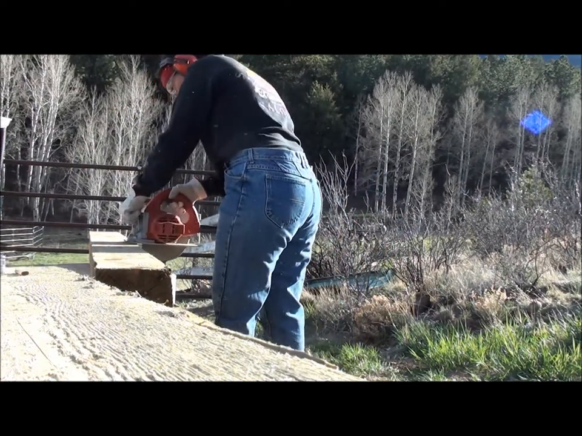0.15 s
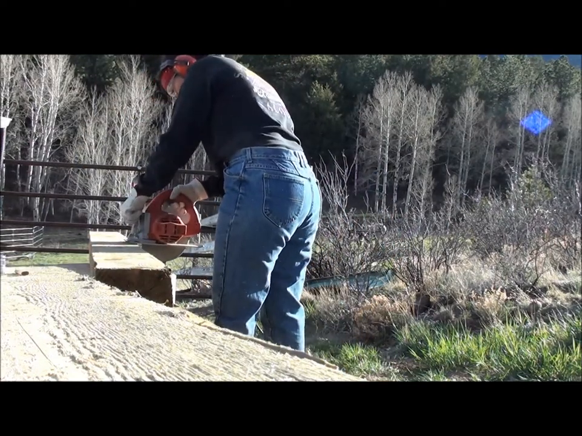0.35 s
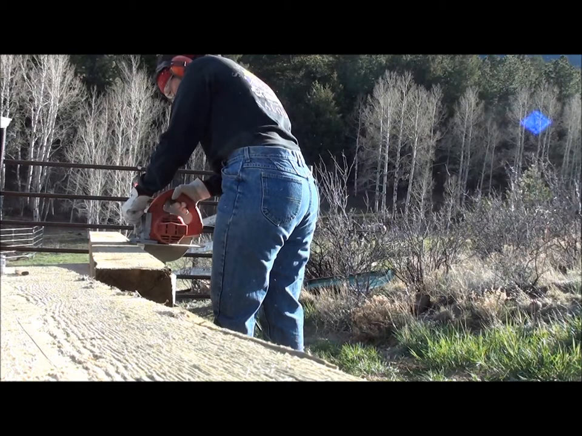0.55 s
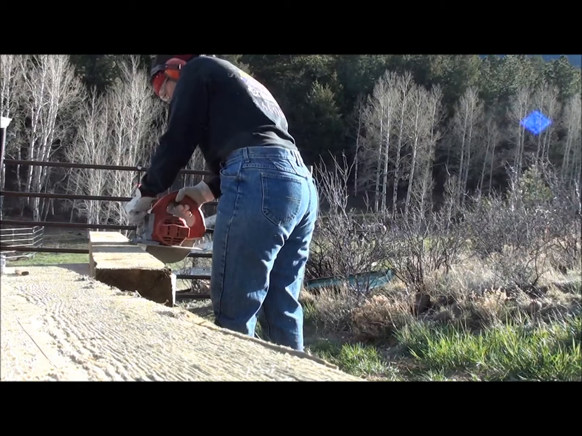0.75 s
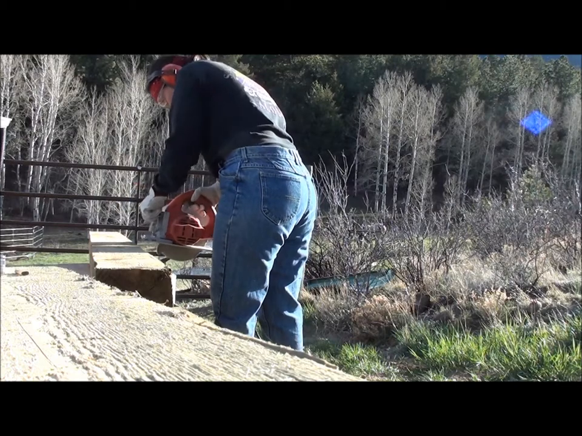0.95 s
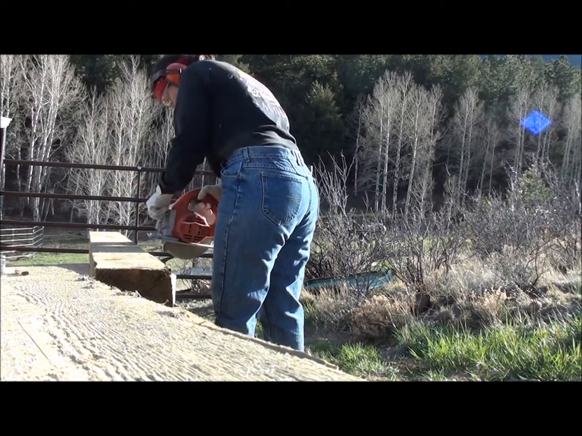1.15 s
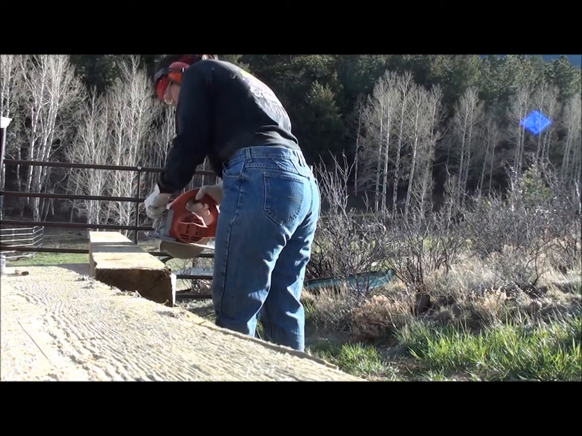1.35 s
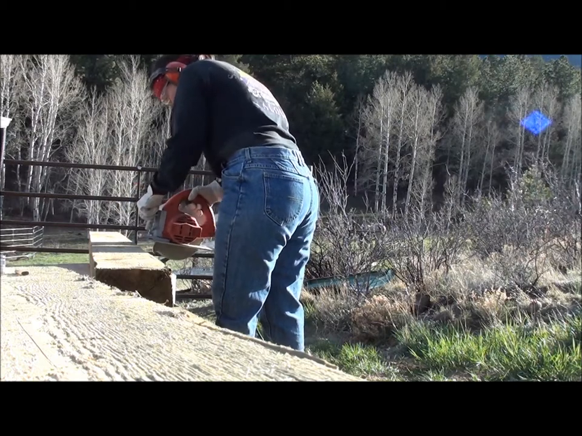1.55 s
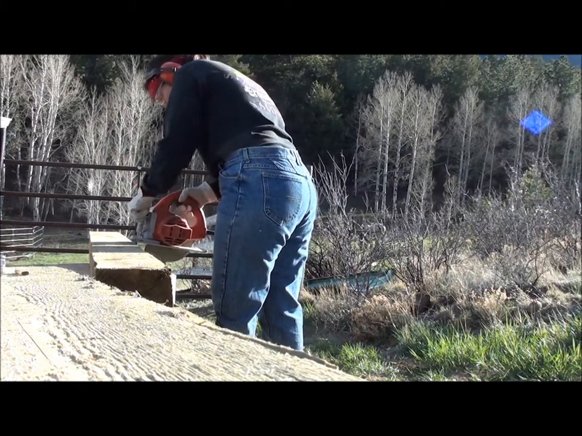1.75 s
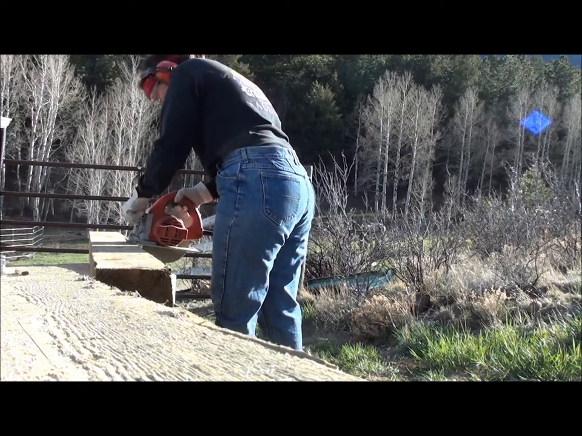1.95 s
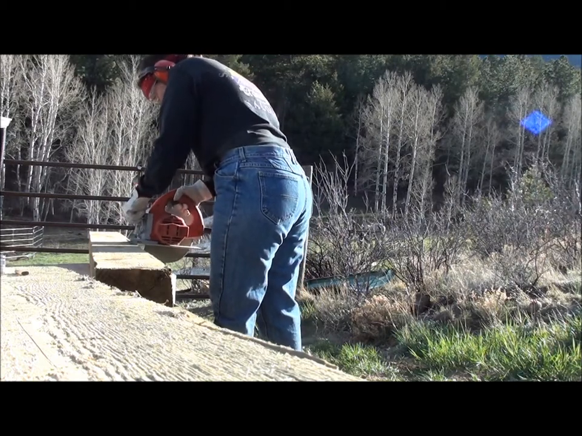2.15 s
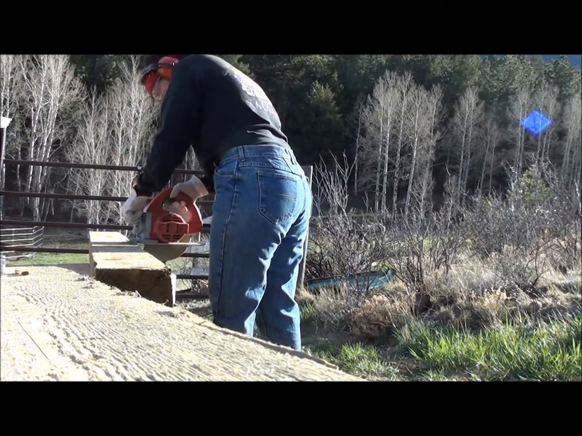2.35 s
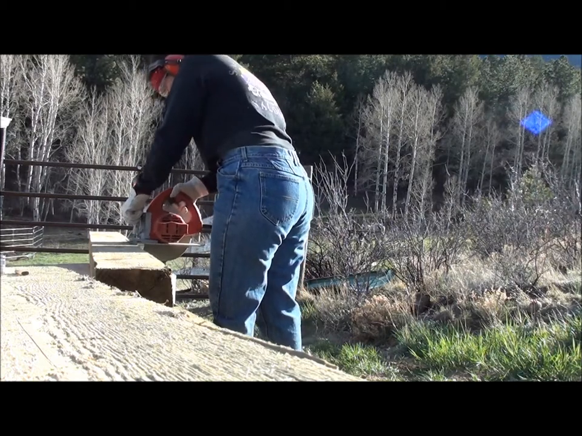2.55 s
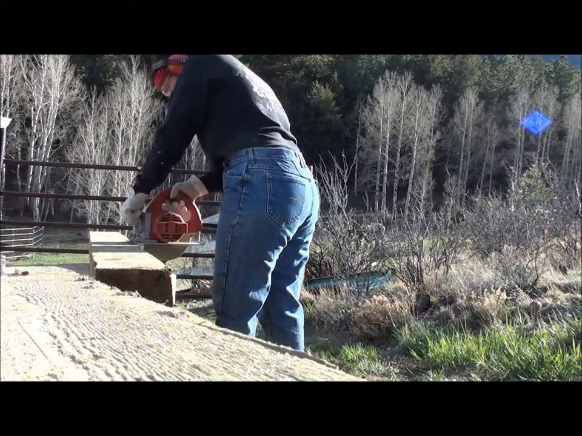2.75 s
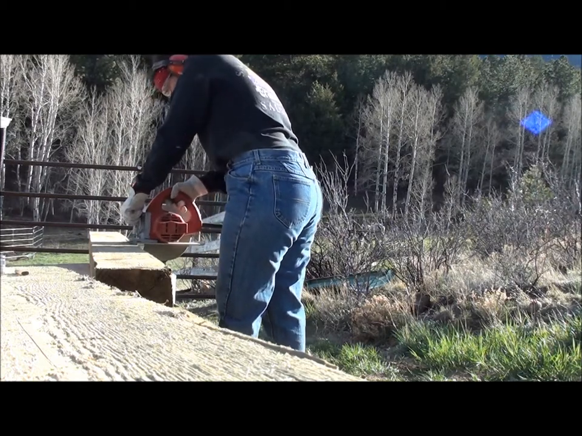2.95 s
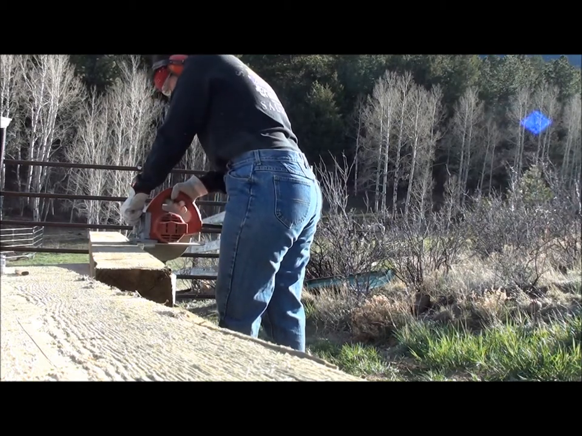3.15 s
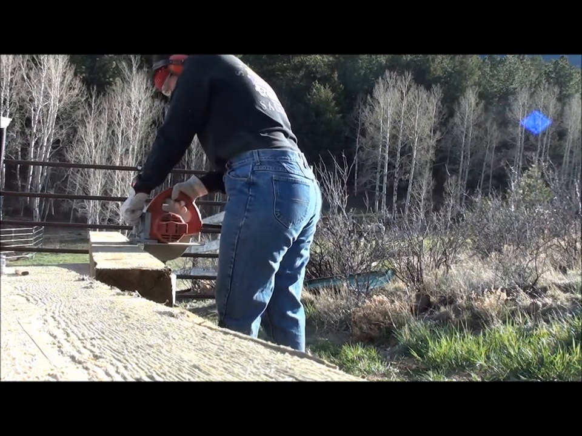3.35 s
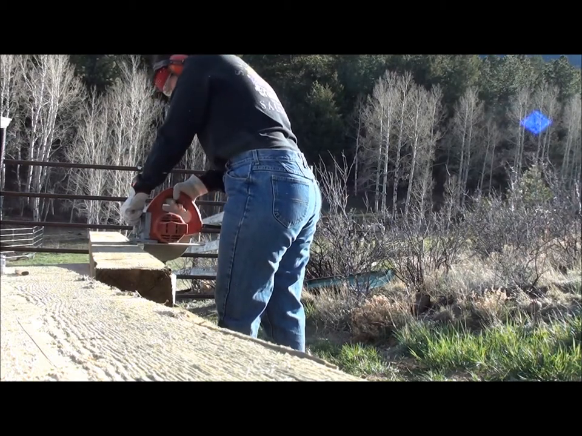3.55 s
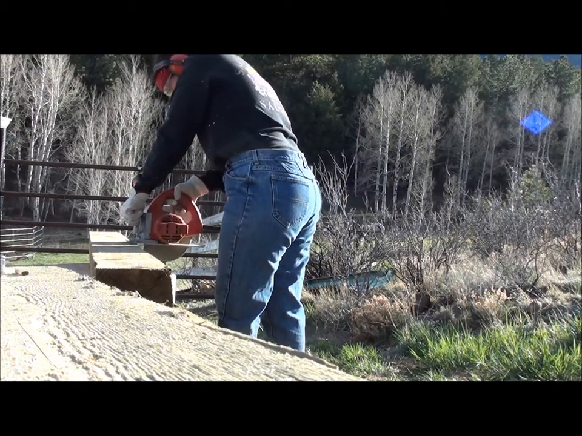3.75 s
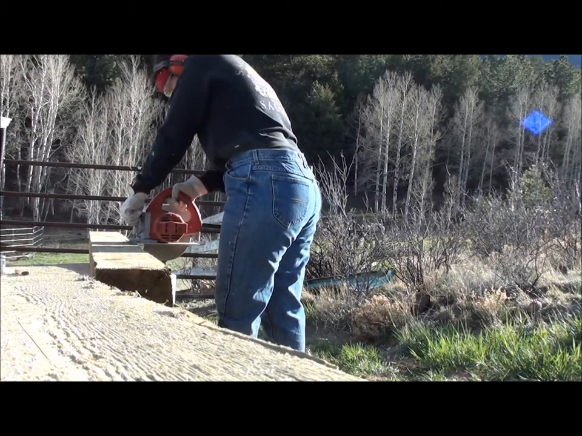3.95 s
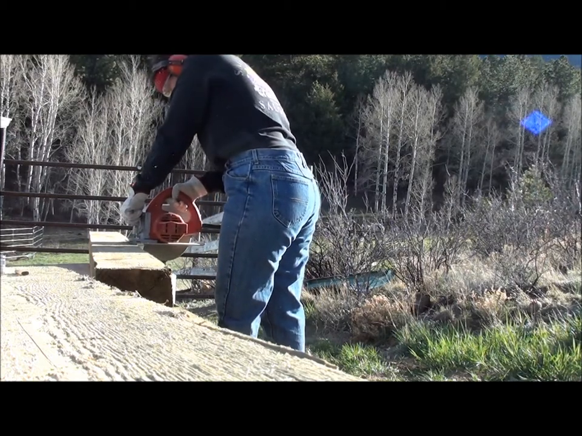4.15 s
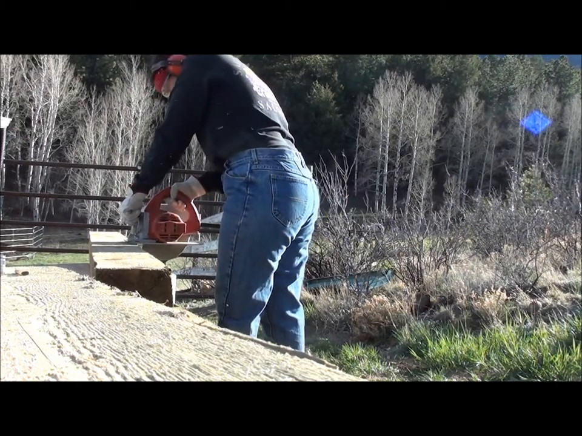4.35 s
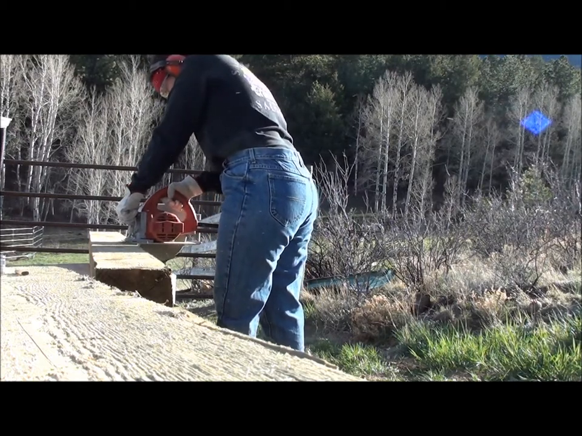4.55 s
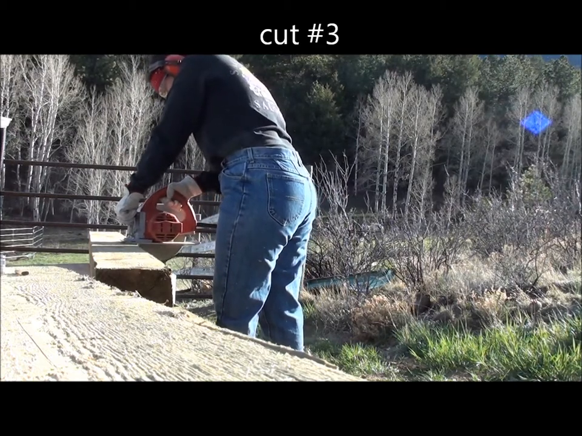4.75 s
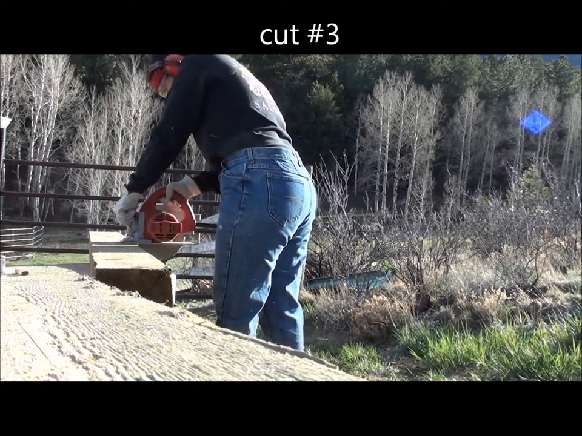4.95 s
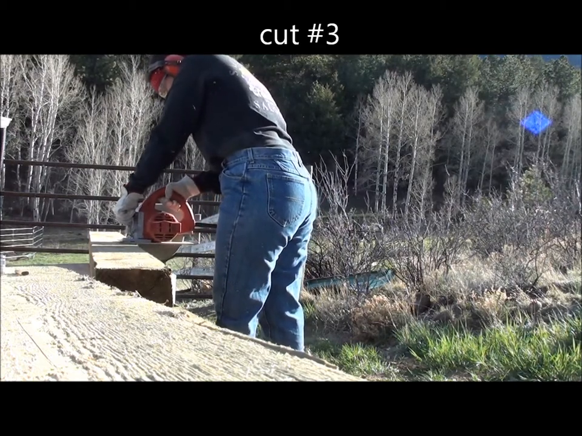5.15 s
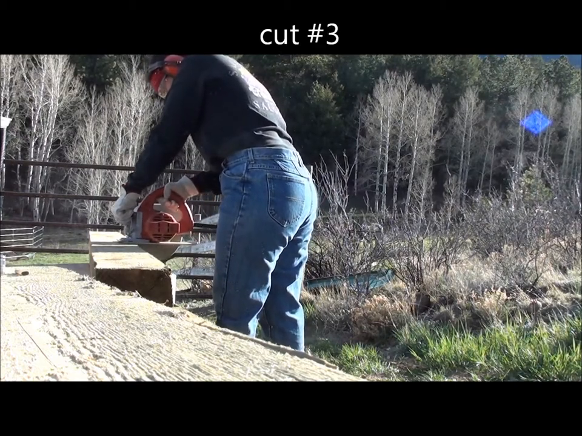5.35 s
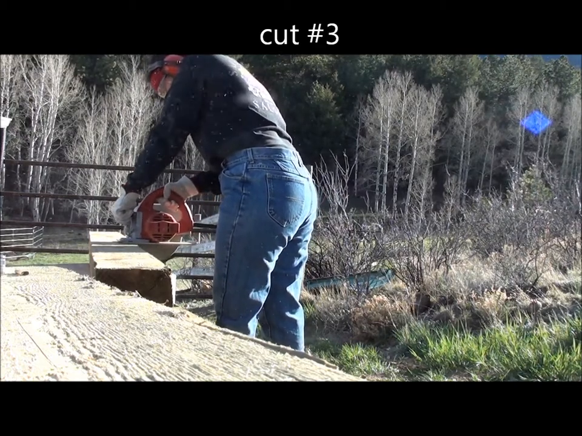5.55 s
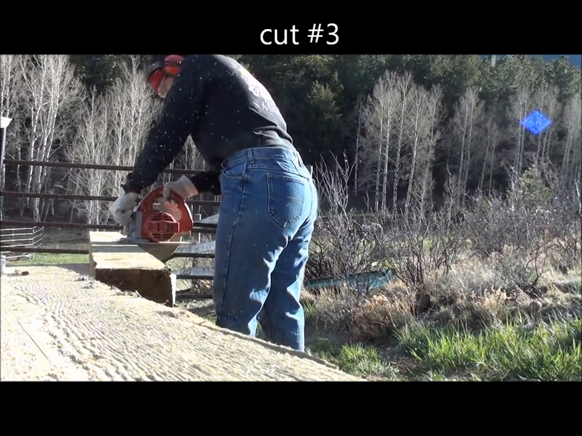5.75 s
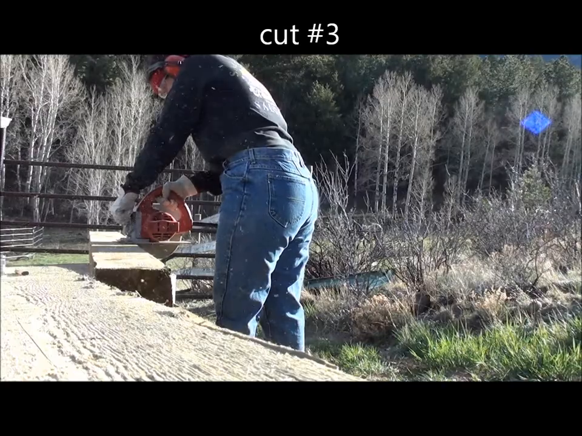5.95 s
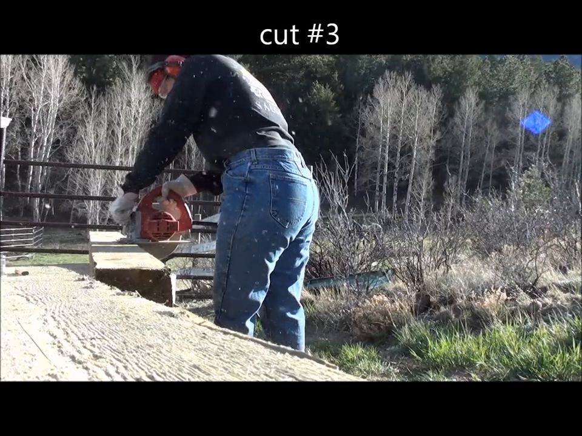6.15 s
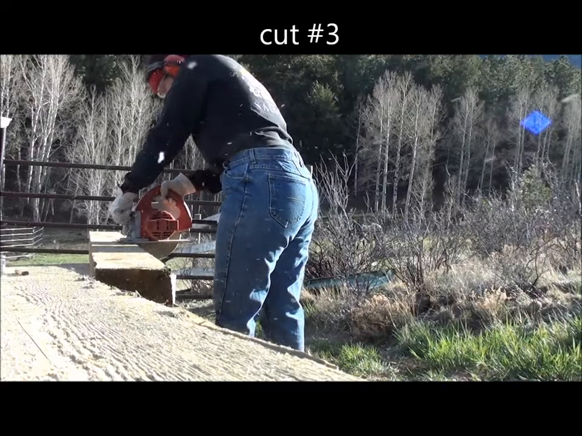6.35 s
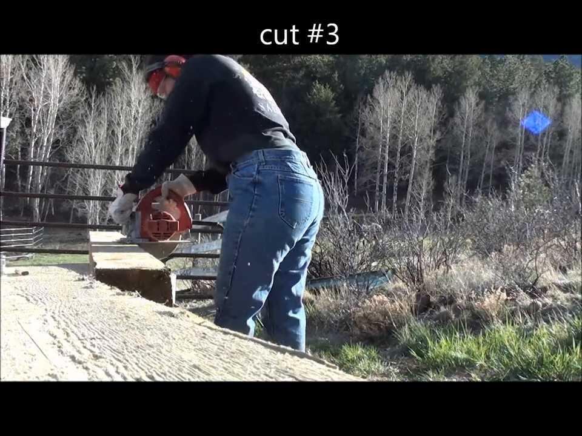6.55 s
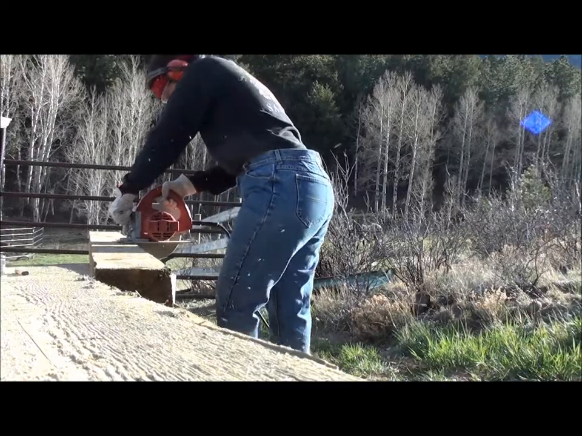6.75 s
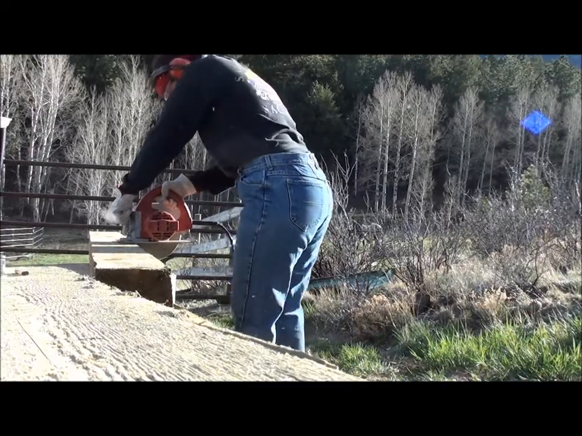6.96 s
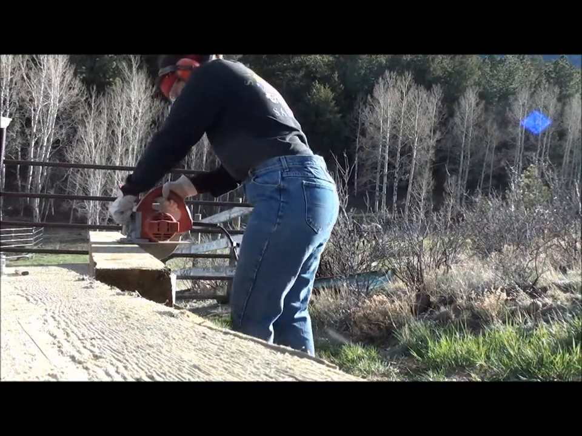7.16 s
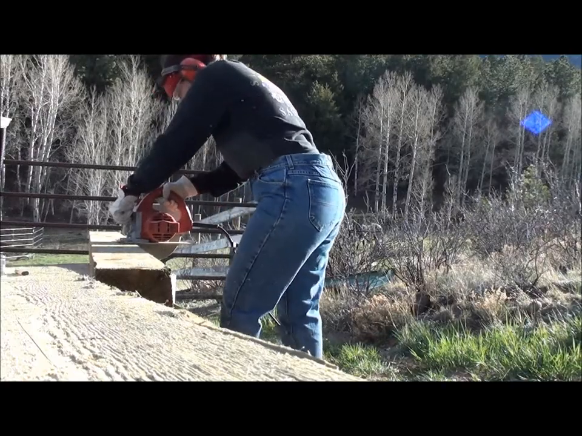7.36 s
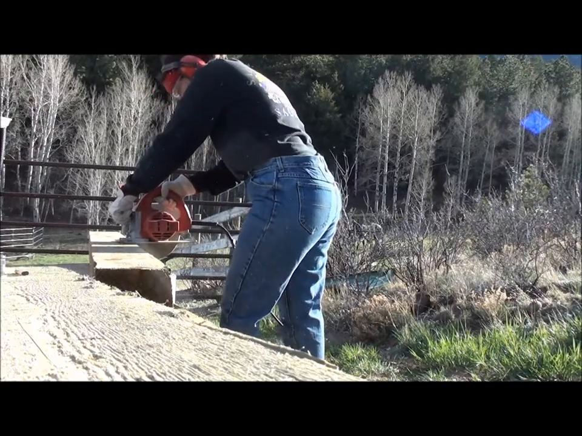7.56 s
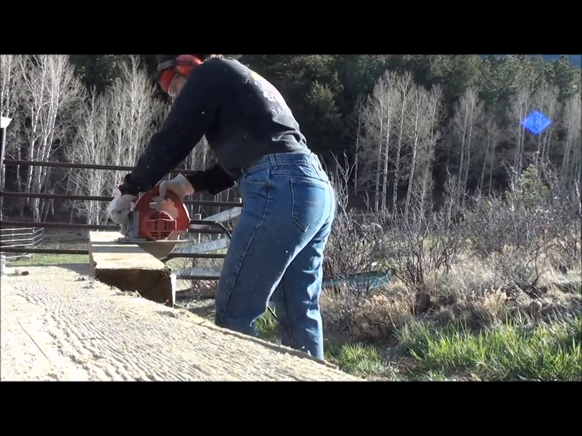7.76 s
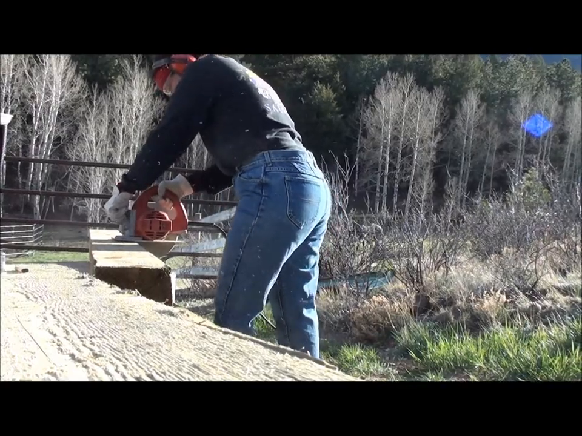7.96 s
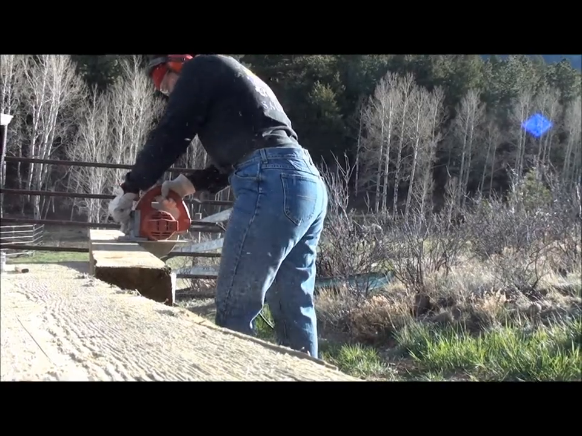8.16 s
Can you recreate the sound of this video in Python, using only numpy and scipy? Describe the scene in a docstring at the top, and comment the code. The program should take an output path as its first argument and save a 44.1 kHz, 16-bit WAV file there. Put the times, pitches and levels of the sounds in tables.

```python
"""A circular saw and hummingbirds

Outdoors, hummingbirds dart past with trilling wings while a circular saw is set on a timber: its shoe scrapes
and knocks. The trigger snaps, the motor growls and winds up to a whine over a roar of air; near the end the
blade bites and rings. Tones that follow the rotor speed make the motor, shaped noise the air and wood, and
chirps the wings. A noise hush lies behind and swells slowly; the background falls away once the saw runs; light
gusts bump the microphone."""
import sys
import numpy as np
from scipy import signal
from scipy.fft import rfft, irfft, next_fast_len
from scipy.io import wavfile
from scipy.ndimage import uniform_filter1d, minimum_filter1d

SR = 44100
rng = np.random.default_rng(int(sys.argv[2]) if len(sys.argv) > 2 else 0)


def int16_out(signal):
    """Quantize to a 16-bit WAV file."""
    q = np.round(np.clip(np.atleast_2d(signal).T, -1, 1) * 32767)
    wavfile.write(sys.argv[1], SR, q.astype(np.int16))


N = 361179
T = np.arange(N) / SR   # time of each sample in seconds

SWITCH_ON_S = 3.727
FREE_TURNS_PER_S = 402.1   # rotor speed with no load
BLADE_RATIO = 4.8   # rotor turns per blade turn
# how hard the teeth are pressed into the wood: (time [s], load [0-1])
FEED = [(6.6, 0), (7.4, .25), (7.63, .78), (7.76, .62), (7.86, 1), (7.98, .68), (8.05, .8), (8.17, .45)]
# stereo spread of most noises: (frequency [Hz], side minus mid [dB])
WIDTH = [(450,-12.5),(1600,-17),(8500,-17.5),(12000,-59)]


def from_db(db):
    """Decibels to gain."""
    return 10 ** (np.asarray(db) / 20)


def rms_one(x):
    """Scale to unit power."""
    return x / np.sqrt(np.mean(x ** 2) + 1e-20)


def in_time(rows):
    """Read each column of a time table at every sample."""
    s, *columns = np.transpose(rows)
    return [np.interp(T, s, column) for column in columns]


def at_hz(points, hz):
    """Read a spectrum, with straight lines on a log-frequency axis."""
    table_hz, table_db = np.array(points)[:, 0], np.array(points)[:, 1]
    return np.interp(np.log(hz), np.log(table_hz), table_db)


def drift(rate):
    """Smooth random wander of spread 1; a higher rate wanders faster."""
    # made at every 40th sample; the first 2000 values let the filter settle
    r = np.exp(-80 * np.pi * rate / SR)
    steps = rng.standard_normal(N // 40 + 2002)
    slow = signal.lfilter([1], [1, -2 * r, r * r], steps)[2000:]
    return np.interp(np.arange(N) / 40, np.arange(len(slow)), rms_one(slow))


def phase_of(hz):
    """Running angle of a changing frequency."""
    return 2 * np.pi * np.cumsum(hz) / SR


def tone(hz):
    """A sine of unit power, starting at a random angle."""
    return np.sqrt(2) * np.sin(phase_of(hz) + rng.uniform(0, 2 * np.pi))


def pan(x, left_db):
    """Make two sides, the left louder by left_db."""
    return x * from_db(np.array([[.5], [-.5]]) * left_db)


def noise(colour, resonances=(), ripple_db=0, spread=WIDTH):
    """Stereo noise of unit power; ripple stands for the many small modes of a body."""
    size = next_fast_len(N)
    hz = np.maximum(np.arange(size // 2 + 1) * SR / size, 1)
    lifts = sum(lift / (1 + (2 * (hz - f) / width) ** 2) for f, width, lift in resonances)
    knots = np.arange(0, SR / 2, 35)
    ripple = ripple_db * np.interp(hz, knots, rng.standard_normal(len(knots)))
    db = at_hz(colour, hz) + lifts + ripple
    mid, side = rfft(rng.standard_normal((2, size))) * from_db(db)
    side = side * from_db(at_hz(spread, hz))
    return rms_one(irfft(np.array([mid + side, mid - side]), size)[:, :N])


def ring(x, hz, t60):
    """A damped resonance: a unit click starts a sine of height 1 that falls 60 dB in t60 seconds."""
    r, w = from_db(-60 / (t60 * SR)), 2 * np.pi * hz / SR
    return signal.lfilter([0, np.sin(w)], [1, -2 * r * np.cos(w), r * r], x + 1e-18)


def band_pass(x, hz, width):
    """One resonance, gain 1 on top."""
    return signal.lfilter(*signal.iirpeak(hz, hz / width, fs=SR), x)


def burst(start, fade, rise):
    """An envelope that rises quickly and dies away."""
    age = np.maximum(T - start, 0)
    return (1 - np.exp(-age / rise)) * np.exp(-np.minimum(age / fade, 50))


def ramp(start, end):
    """Rises evenly from 0 to 1 between two moments."""
    return np.clip((T - start) / (end - start), 0, 1)


def swell(s, half):
    """A flat-topped swell around a moment."""
    return np.exp(-.5 * np.minimum(np.square((T - s) / half), 10) ** 2)


def rotor_speed():
    """Turns per second: the rotor closes in on its free speed until the wood brakes it."""
    # a quick surge and a slow creep, until air drag holds the speed: (share of free speed, time constant [s])
    run_up = [(.432, .157), (.574, .62)]
    # the wood grazes first and then bites: (start [s], end [s], speed lost [turns per s])
    braking = [(7.3, 7.8, 3), (7.8, 8.07, 25)]
    age = np.maximum(T - SWITCH_ON_S, 0)
    free = FREE_TURNS_PER_S * sum(share * (1 - np.exp(-age / lag)) for share, lag in run_up)
    lost = sum(loss * ramp(start, end) for start, end, loss in braking)
    braked = np.minimum(free, FREE_TURNS_PER_S) - lost
    return np.maximum(braked, 1) * (1 + 0.00024 * drift(16))


def roar(turns, load):
    """Air through fan and guard: the lows grow most with speed, the cut muffles it, and the resonances waver in strength."""
    # spectrum of the rushing air: (frequency [Hz], level [dB per Hz])
    roar_colour = [(120, -56), (200, -22.5), (399, -9), (690, -6.5), (890, -12.5), (1380, -6.5),
                   (2470, -5.5), (2850, -10), (3360, -4), (5110, -4), (6350, 0), (8660, -7.5),
                   (11400, -24.5), (12900, -27), (15500, -63)]
    # resonances of the guard and housing: (frequency [Hz], width [Hz], lift [dB])
    resonances = [(1400,350,3.6),(2400,260,3),(3460,220,1.3)]
    # change of each range: (lower edge [Hz], at standstill [dB], at full load [dB], in the brief dip [dB])
    roar_bands = [(0, -9, -9.5, -1.7), (1150, -7.5, -9, -2.5), (2900, -8.5, -9, -2.5), (5500, -7, -7, -1)]
    air = noise(roar_colour, ripple_db=1.1)
    for hz, width, lift_db in resonances:
        # each resonance grows stronger and weaker as the saw moves
        lift = from_db(lift_db + 1.0 * drift(9)) - 1
        air = air + lift * band_pass(air, hz, width)
    size = next_fast_len(N)
    spectrum, bins = rfft(rms_one(air), size), np.arange(size // 2 + 1) * SR / size
    slip = 1 - turns / FREE_TURNS_PER_S   # share of the speed still missing
    dip = swell(6.29, .16)   # the roar dips briefly
    tops = [row[0] for row in roar_bands[1:]] + [SR]
    out = 0
    for (low, rest_db, buried_db, dip_db), high in zip(roar_bands, tops):
        band = irfft(spectrum * ((bins >= low) & (bins < high)), size)[:, :N]
        out = out + band * from_db(rest_db * slip + buried_db * load ** 2 + dip_db * dip)
    return out


def blade(turns):
    """The roar flutters with each turn of the blade; in the wood the teeth rasp and the steel plate rings."""
    # spectrum of the rasping teeth: (frequency [Hz], level [dB per Hz])
    bite_colour = [(1500,-25),(4000,-1.5),(7000,1),(8700,4),(10000,-8),(15500,-44)]
    # plate modes, each swelling as the rim rubs: (frequency [Hz], loudest time [s], half length [s], level [dB])
    plate_modes = [(1920,7.37,.11,-25.5),(3760,8.16,.05,-29),(4145,7.67,.09,-21.3),(4781,7.655,.095,-21.8),(4480,8.12,.035,-26),(4942,8.02,.04,-25),(6686,7.68,.09,-27.5),(7090,7.9,.06,-26),(7845,7.89,.07,-22.5),(7810,8.03,.055,-22),(8425,7.78,.11,-27.5),(8690,8.07,.04,-25.5),(8764,7.83,.045,-27)]
    roar_db, rasp_db = -12.1, -15.5   # roar at free speed, rasp at full load
    load, = in_time(FEED)
    turning = np.sin(phase_of(turns / BLADE_RATIO))
    air = roar(turns, load) * from_db(roar_db + .5 * turning + 0.75 * drift(130))
    rasp_gain = from_db(rasp_db + turning + 0.96 * drift(100))
    rasp = load * noise(bite_colour, ripple_db=1.5) * rasp_gain
    rings = 0
    for hz, s, half, db in plate_modes:
        unsteady_hz = hz * (1 + .001 * drift(30))
        rings = rings + swell(s, half) * from_db(db + 1.5 * drift(15)) * tone(unsteady_hz)
    return ramp(SWITCH_ON_S, SWITCH_ON_S + .04) * air + rasp + rings


def rotor_tones(turns, spun_up):
    """Hums at whole multiples of the turning rate, stronger as the rotor speeds up."""
    # rotor tones before the housing colours them: (multiple of the turning rate, level [dB])
    orders = [(1,-39.5),(12,-36),(15,-36),(16,-26.5)]
    # how well the housing radiates them: (frequency [Hz], level [dB])
    rotor_colour = [(4700,-9),(5300,1),(5750,1.5),(6000,-5),(6300,-5),(6420,.5)]
    out = 0
    for k, db in orders:
        gain = from_db(db + at_hz(rotor_colour, k * turns) + 2 * drift(8))
        out = out + gain * tone(round(k) * turns)
    return spun_up ** 2 * out


def commutator_whine(turns, spun_up):
    """The 32 commutator bars passing in each turn make a whine that climbs with the speed."""
    # loudness of the whine along its climb: (frequency [Hz], level [dB])
    whine_colour = [(6700,-38),(7450,-22.5),(8300,-21.5),(9500,-32),(11900,-41.5),(12500,-31.5),(12900,-39)]
    buried_db = -4.5   # change at full load
    bars_hz = 32 * turns
    load, = in_time(FEED)
    whine = from_db(at_hz(whine_colour, bars_hz) + buried_db * load + drift(15)) * tone(bars_hz)
    # higher multiples sweep past only while the rotor is still slow
    overtones = 0
    for k in (1.5, 2):
        overtones = overtones + np.clip((14000 - k * bars_hz) / 3000, 0, 1) * tone(k * bars_hz)
    return whine + spun_up * from_db(-37) * overtones


def tooth_whistle(turns, spun_up):
    """Vortices leave the teeth unsteadily, once stronger in each turn of the blade; at speed they fray into an airy band."""
    # the whistle follows the rotor up to a ceiling of 4350 Hz
    hz = np.minimum(13.3 * turns, 4350)
    vortex_hz = hz + 100 * drift(150)
    throb = 1 + .7 * np.sin(phase_of(turns / BLADE_RATIO))
    octave = 2.3 * (1 - spun_up) * tone(2 * vortex_hz + 60 * drift(150))
    during_run_up = swell(4.31, .41)
    whistle = from_db(-22.5) * during_run_up * throb * (tone(vortex_hz) + octave)
    airy_band = rms_one(band_pass(rng.standard_normal(N), 4250, 300))
    return whistle + from_db(-28) * swell(5.3, .75) * airy_band


def motor(turns):
    """Rotor tones, commutator whine and the whistle of the teeth start together once the power is on."""
    running = ramp(SWITCH_ON_S, SWITCH_ON_S + .044)
    spun_up = turns / turns.max()
    tones = rotor_tones(turns, spun_up) + commutator_whine(turns, spun_up)
    return running * (tones + tooth_whistle(turns, spun_up))


def start_up(turns):
    """The inrush current hums at twice the mains rate and rattles the gears in step; it ebbs as the rotor gains speed."""
    # spectrum of the rattling gears: (frequency [Hz], level [dB per Hz])
    gear_colour = [(230,-14),(380,-8),(790,-13),(950,-1.5),(1800,1),(2600,0.5),(3000,-10.5),(7400,-8),(12000,-44)]
    inrush_db, idle_db = -13, -46   # gain at full current, and the part that stays when running free
    full_current_slip = .64   # strain falls once the speed lacks less than this share
    mains = 2 * np.pi * 119.7 * T   # angle at twice the mains rate
    rattle = rms_one(from_db(2.8 * np.sin(mains) + 1.5 * drift(170)))
    gears = noise(gear_colour, ripple_db=3.0) * rattle
    hum = from_db(-13) * np.sin(mains) + from_db(-22.5) * np.sin(2 * mains)
    current = np.clip((1 - turns / FREE_TURNS_PER_S) / full_current_slip, 0, 1)
    strain = from_db(inrush_db) * current ** 1.9 + from_db(idle_db)
    return ramp(SWITCH_ON_S, SWITCH_ON_S + .028) * strain * (from_db(-0.5) * gears + hum)


def trigger():
    """The switch contact is a tiny burst of noise that sets several small parts ringing."""
    # ringing parts: (frequency [Hz], peak level [dB], time to fall 60 dB [s])
    snap_modes = [(1500,-20,.008),(3350,-15,0.0062),(4740,-7.5,0.0098),(6000,-7,0.0063),(7900,-9,0.0076)]
    contact = burst(SWITCH_ON_S, 0.0011, 0.00093) * rng.standard_normal(N)
    out = 0
    for hz, db, t60 in snap_modes:
        mode = ring(contact, hz, t60)
        out = out + from_db(db) * mode / np.abs(mode).max()
    return out


def squeak(start, db, fade, hz):
    """One push of the shoe: a hoarse squeak in two resonances that rise as it slides."""
    rise = .2 * (1 - np.exp(-np.maximum(T - start, 0) / .09))   # share of the pitch
    hz = hz * (1 + rise + .06 * drift(110))
    both = from_db(-7) * tone(hz) + from_db(-10) * tone(.56 * hz)
    return from_db(db + 2.5 * drift(100)) * burst(start, fade, .003) * both


def scraping():
    """The shoe slides over the timber in short rough pushes, each a scrape of noise with a squeak."""
    # spectrum of the scrape: (frequency [Hz], level [dB per Hz])
    scrape_colour = [(200,-22),(550,5.5),(880,-1),(1120,4.5),(1350,-16),(3000,-29.5)]
    # pushes: (start [s], level before rise and fade [dB], fading time [s], squeak pitch at the start [Hz])
    pushes = [(.327,-41,0.075,1000),(1.268,-44,0.027,700),(1.33,-43.5,0.13,970),(1.969,-42,.05,1000),(2.248,-34,0.054,980),(2.29,-41,0.12,1000)]
    slide = sum(from_db(db) * burst(s, fade, 0.0018) for s, db, fade, _ in pushes)
    scrape = slide * from_db(2.0 * drift(120)) * noise(scrape_colour)
    return scrape + sum(squeak(*push) for push in pushes)


def knocking():
    """Guard and shoe knock: each short burst of noise excites one quickly damped resonance."""
    # knocks: (start [s], peak level [dB], centre frequency [Hz])
    knocks = [(0.0702, -29.5, 4690), (0.5696, -38, 3770), (0.7472, -33.5, 1880), (0.8535, -33.5, 2170),
              (0.9647, -32, 1880), (1.1204, -39.5, 2080), (1.4147, -35.5, 1880), (1.9215, -32.5, 3730),
              (2.1819, -25.5, 1770), (2.595, -29, 2210), (3.6097, -28, 5200)]
    out = 0
    for s, db, hz in knocks:
        knock = ring(burst(s, 0.0072, 0.00034) * rng.standard_normal(N), hz, 0.0023)
        out = out + from_db(db) * knock / np.abs(knock).max()
    return out


def to_the_left(x, lead_rad):
    """Reflections off the timber favour the left side: a little louder, and ahead in the low tones."""
    # tilt towards the left: (frequency [Hz], left minus right [dB])
    left_lift = [(400,0),(850,2.3),(1700,.7),(2300,3.5),(2900,.7),(5200,1.3)]
    hz = np.maximum(np.arange(N // 2 + 1) * SR / N, 1)
    turn = 1j * lead_rad / (1 + (hz / 1000) ** 4)
    sides = pan(1, at_hz(left_lift, hz)) * np.exp(turn * np.array([[.5], [-.5]]))
    return irfft(rfft(x) * sides, N)


def wing_trill(flight, chirp_s, sag_hz, flutter_db):
    """Wing-tip feathers whistle once a beat, the note sagging as the stroke ends; the bird comes closer, then draws away."""
    start, end, beats_per_s, first_hz, last_hz, closest_s, closest_db, fade_db_per_s, left_db = flight
    hz = np.interp(T, [start, end], [first_hz, last_hz])
    db = closest_db - fade_db_per_s * np.abs(T - closest_s)
    beats = (T - start) * beats_per_s + .5
    age = (beats % 1 - .5) / beats_per_s / chirp_s   # time from mid-stroke, in chirp lengths
    stroke = rms_one(np.exp(-age ** 2) * np.clip((1.6 - np.abs(age)) * 2, 0, 1))
    flying = (beats > 0) & (np.floor(beats) < (end - start) * beats_per_s)
    sag = sag_hz * np.clip(age, -.5, 2) ** 3
    whistle = tone(hz - sag + 60 * drift(92))
    return pan(flying * stroke * whistle * from_db(db + flutter_db * drift(20)), left_db)


def birds():
    """Hummingbirds dart about in short flights; ground and trees answer with faint echoes, different on each side."""
    # flights: (first wingbeat [s], end [s], wingbeats [per s], first pitch [Hz], last pitch [Hz],
    # closest time [s], level there [dB], loss away from there [dB per s], left minus right [dB])
    flights = [(.017, .25, 45.6, 5930, 6170, .187, -37, 110, 1.5),
               (.495, 1.28, 45.7, 6130, 6000, .9, -50, 8, 0),
               (.532, .98, 45.6, 6520, 6380, .95, -36, 36, -2.5),
               (.55, 1.42, 46, 6470, 6560, .8, -48, 16, -1.5),
               (1.424, 1.685, 44.2, 6570, 6500, 1.59, -40, 45, 1.3),
               (1.699, 2.645, 45.96, 6520, 6090, 1.97, -23.8, 4.5, 2.4),
               (2.335, 2.66, 46, 6600, 6690, 2.6, -26, 30, 0),
               (2.698, 2.99, 45.6, 6540, 6490, 2.877, -30, 100, -2),
               (3.012, 3.34, 45.6, 6700, 6360, 3.03, -30, 15, -4),
               (3.003, 3.315, 43.1, 6600, 6320, 3.24, -22.5, 55, -5),
               (3.334, 3.8, 46, 6450, 6340, 3.34, -38, 20, -4),
               (3.38, 3.8, 46, 6090, 5980, 3.44, -35, 40, -4)]
    # brief changes of the trill: (time [s], change [dB])
    flares = [(1.765, 6), (1.868, 5), (1.97, 6), (2.168, 6), (2.272, 4.5), (3.281, 3)]
    chirps = sum(wing_trill(flight, chirp_s=.0036, sag_hz=110, flutter_db=1.3) for flight in flights)
    chirps = chirps * from_db(sum(db * swell(s, .016) for s, db in flares))
    lags = (rng.uniform(.0075, .05, (2, 6)) * SR).astype(int)   # six echoes a side
    echoes = np.array([sum(np.pad(side, (lag, 0))[:N] for lag in own) for side, own in zip(chirps, lags)])
    return chirps + from_db(-18) * echoes


def outdoors():
    """A noise hush with two faint far drones swells slowly; the background falls away later on; lumpy low gusts
    bump the microphone."""
    # spectrum of the hush: (frequency [Hz], level [dB per Hz])
    air_colour = [(20,-18),(90,-8),(170,-4.5),(280,-4.5),(480,-4.5),(700,-7),(1100,-12.5),(2500,-18.5),(15500,-21.5)]
    # the open air is wider than the saw: (frequency [Hz], side minus mid [dB])
    air_width = [(120, -14), (480, -11), (1890, -3), (7520, -9), (15000, -29)]
    # background hush: (time [s], level [dB])
    hush_levels = [(0,-48),(1.5,-44.5),(3.4,-39.5),(7.8,-57.5)]
    # spectrum of the gusts: (frequency [Hz], level [dB per Hz])
    gust_colour = [(20,-8),(60,-3),(125,1),(200,-7),(600,-49)]
    # wind bumps: (time [s], level before the lumps and their 4 dB cut [dB], half length [s])
    gust_bumps = [(.717,-30.5,.052),(.855,-34,.043),(1.357,-30,.014),(1.71,-39,.04),(2.54,-38,.11),(3.658,-37,.06),(4.244,-25,.022),(4.424,-31,.06),(4.927,-33,.02),(5.745,-35,.016),(5.92,-33,.014),(6.02,-32,.016),(6.11,-34,.014),(6.576,-35.5,.073),(6.84,-37,.016),(7.338,-41,.05)]
    drones = [(442, 35, 6.1), (663, 38, 5.7)]   # (frequency [Hz], width [Hz], lift [dB])
    hush = from_db(in_time(hush_levels)[0])
    gusts = from_db(-10.5) * hush
    for s, db, half in gust_bumps:
        gusts = gusts + from_db(db) / np.cosh(np.clip((T - s) / half, -20, 20))
    lumps = from_db(-4 + 2.8 * drift(24))
    return hush * noise(air_colour, drones, spread=air_width) + gusts * lumps * noise(gust_colour)


def scene():
    """Saw, birds and open air."""
    turns = rotor_speed()
    handling = trigger() + scraping() + knocking()
    saw = blade(turns) + motor(turns) + start_up(turns) + handling
    return to_the_left(saw, lead_rad=0.1) + birds() + outdoors()


def record(dry):
    """Peaks are rounded, a fast limiter holds the highest down, the top is cut."""
    limit, size = .85, int(.002 * SR)   # ceiling, and reaction time of 2 ms in samples
    cutoff_hz = 16494
    x = 1.65 * np.tanh(dry / 1.563)
    needed = limit / np.maximum(np.abs(x).max(axis=0), limit)
    gain = uniform_filter1d(minimum_filter1d(needed, size), size)
    top_cut = signal.cheby2(12, 70, cutoff_hz, fs=SR, output="sos")
    return signal.sosfilt(top_cut, x * gain)


dry = scene()
out = record(dry)
int16_out(out)
```